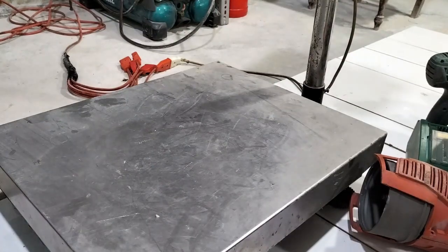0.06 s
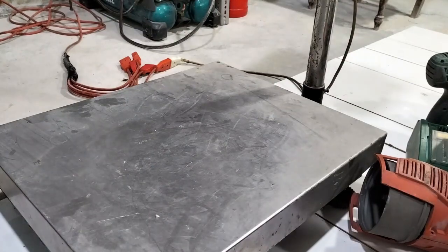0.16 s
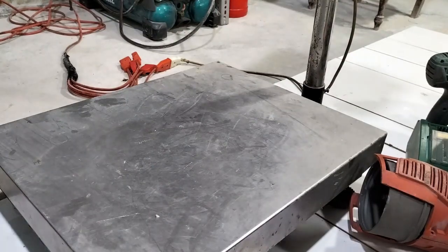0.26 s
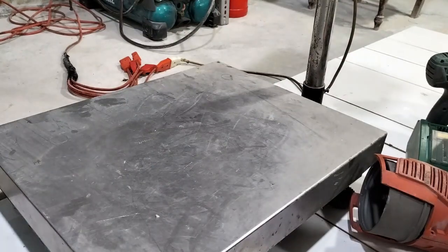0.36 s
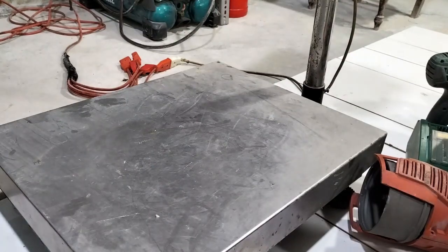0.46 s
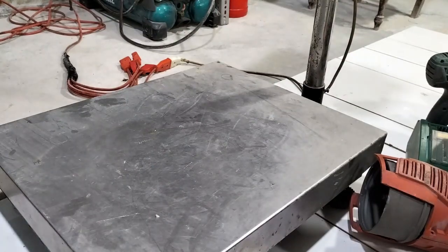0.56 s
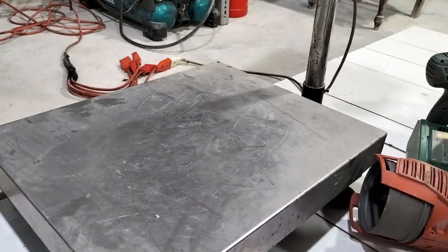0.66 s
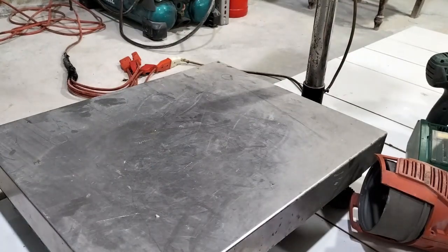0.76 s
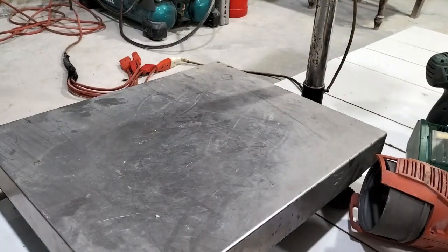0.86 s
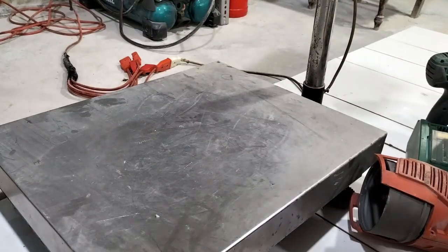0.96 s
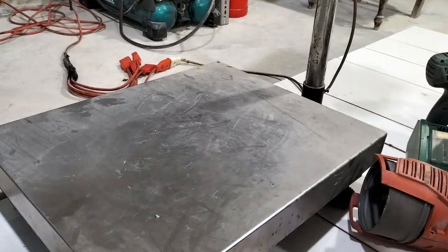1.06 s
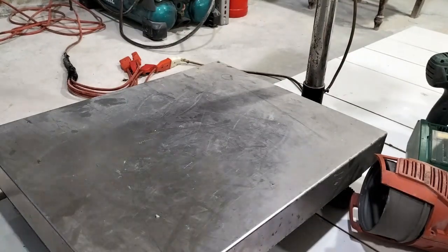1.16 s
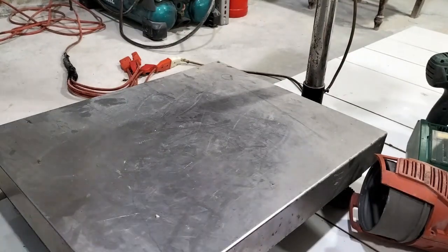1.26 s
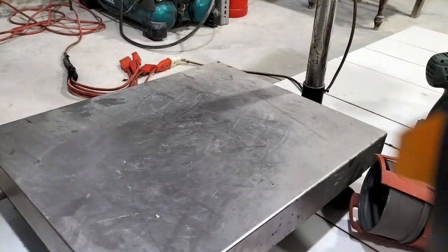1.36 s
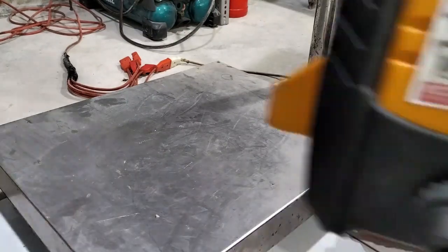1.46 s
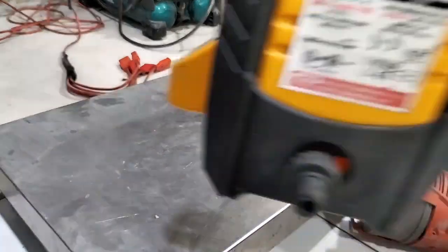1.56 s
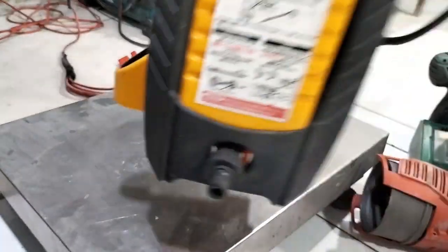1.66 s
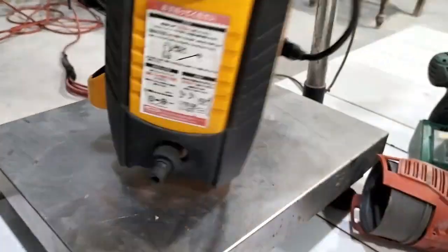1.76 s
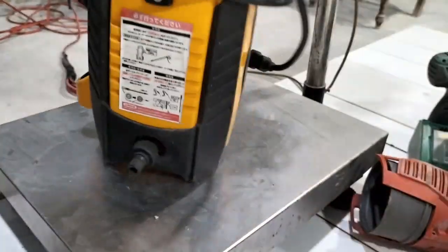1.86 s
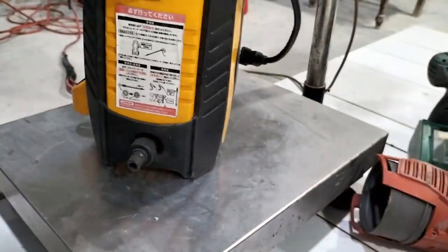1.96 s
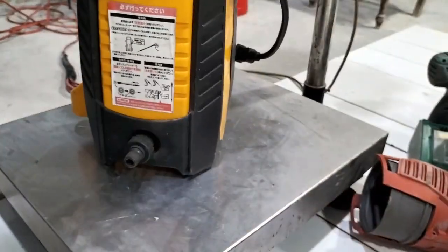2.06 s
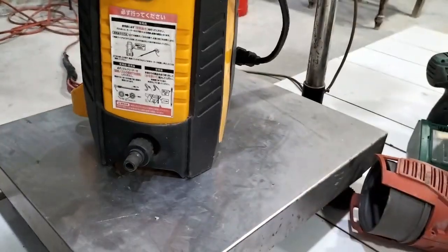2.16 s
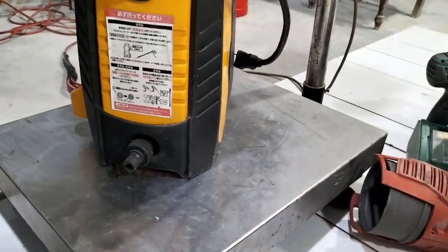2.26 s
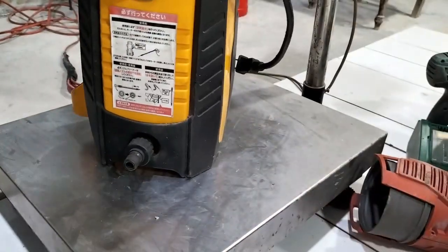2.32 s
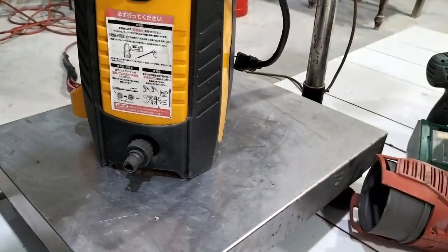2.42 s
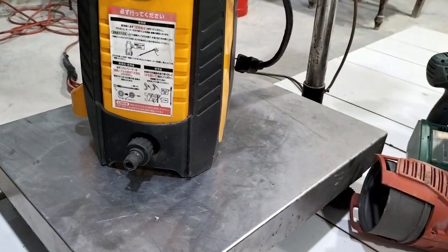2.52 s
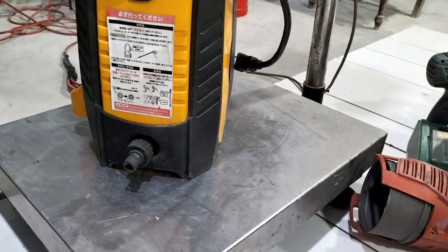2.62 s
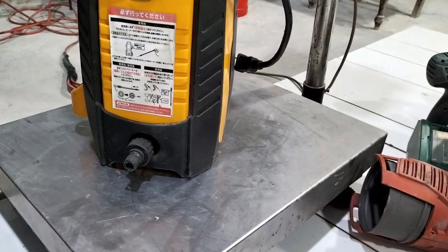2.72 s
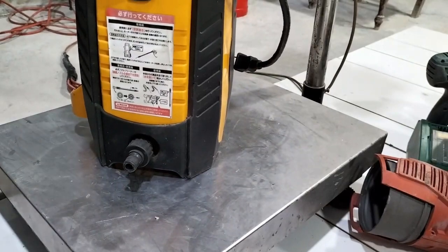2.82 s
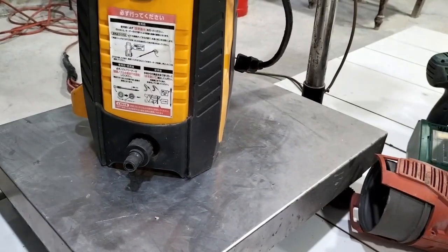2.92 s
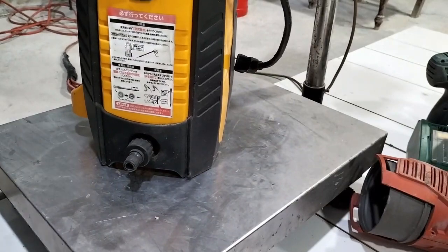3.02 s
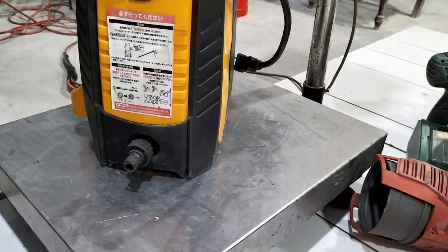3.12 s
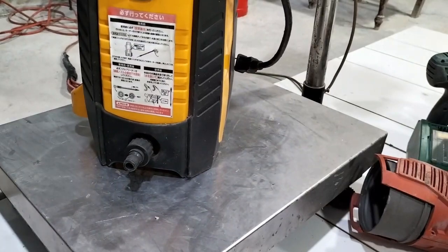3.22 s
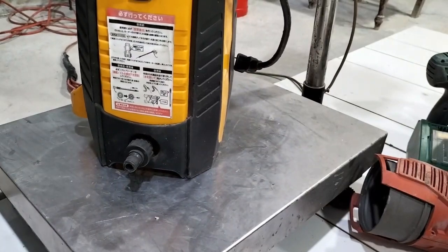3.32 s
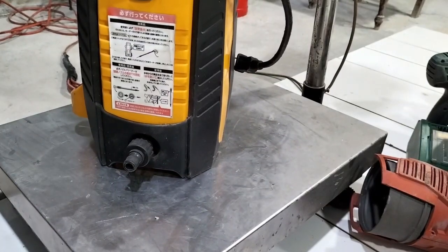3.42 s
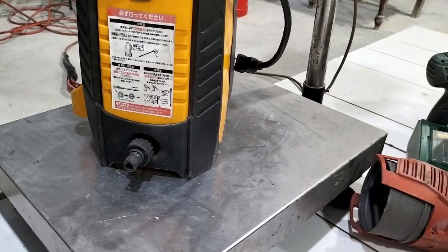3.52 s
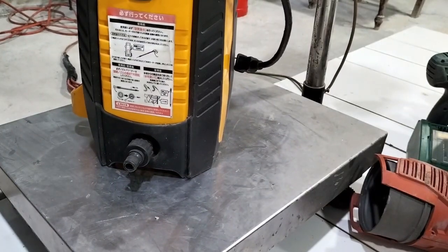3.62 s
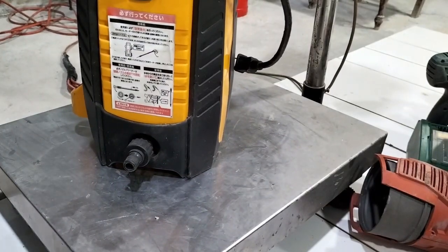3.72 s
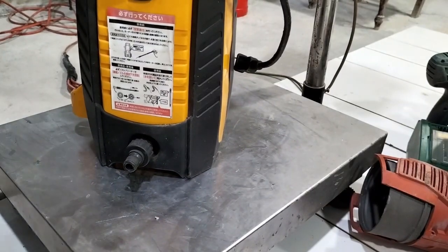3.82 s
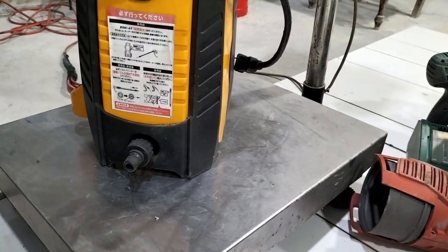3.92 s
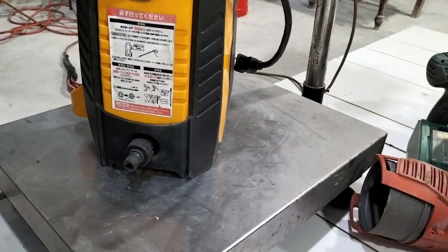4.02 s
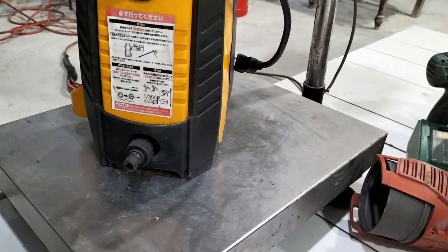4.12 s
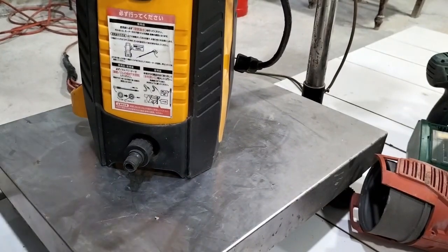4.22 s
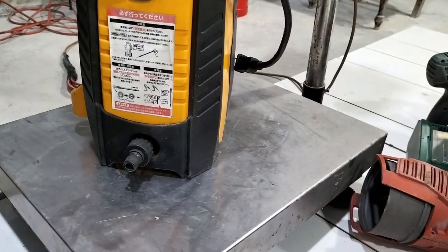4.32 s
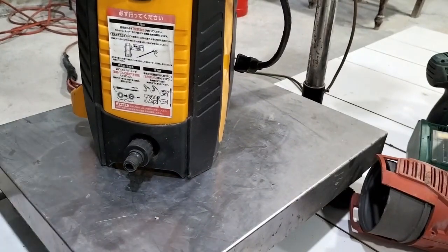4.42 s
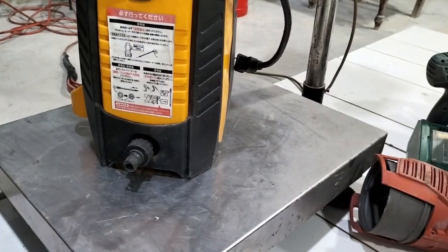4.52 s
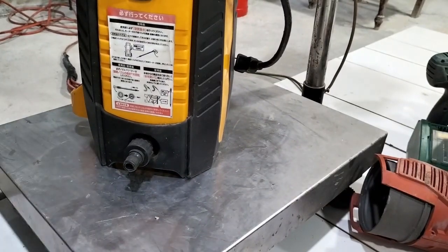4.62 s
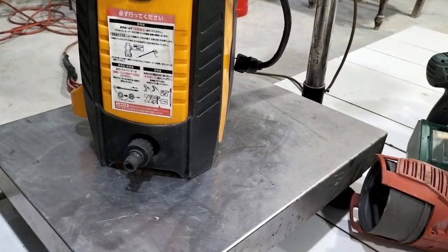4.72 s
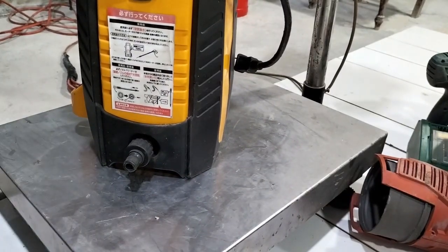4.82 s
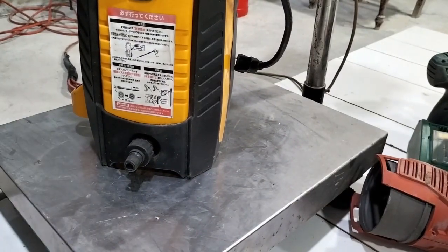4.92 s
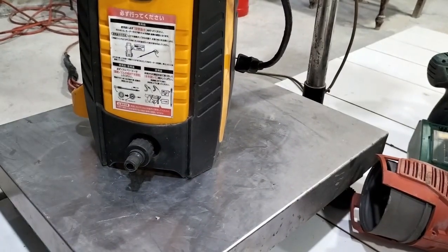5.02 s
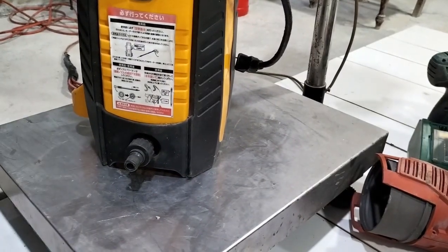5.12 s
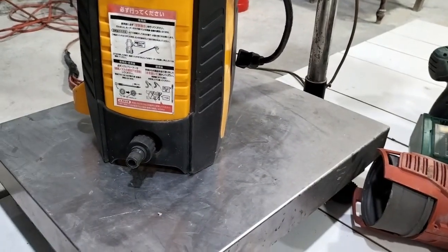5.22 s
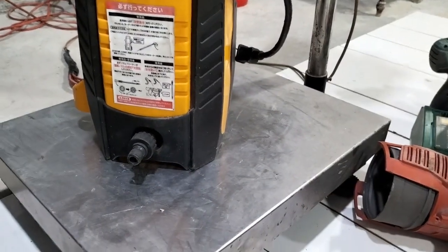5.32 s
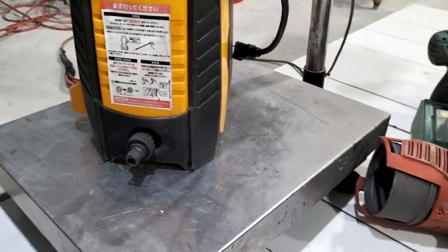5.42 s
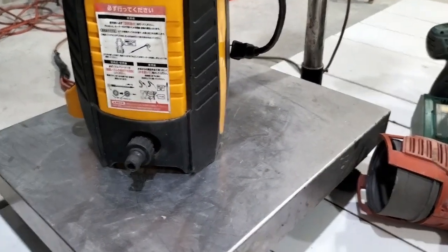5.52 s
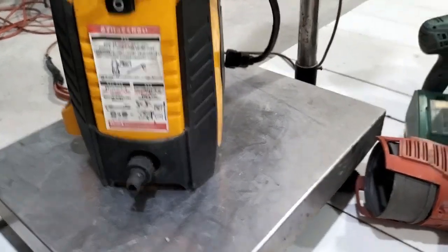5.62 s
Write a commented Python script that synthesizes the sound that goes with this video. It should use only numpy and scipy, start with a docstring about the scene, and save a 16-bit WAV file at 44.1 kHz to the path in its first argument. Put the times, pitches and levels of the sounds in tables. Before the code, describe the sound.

A heavy machine knocks down onto a steel platform and rocks in fading knocks, followed by light handling taps and scuffs.

```python
"""A steel platform scale booms and rings as a heavy machine is lowered onto it in a quiet workshop. It rocks on
its feet in ever lighter knocks: each impact drives the frame, the plate's bending modes and loose parts. Shoes
and hands scuff by friction; light taps, many of them clacks of the rocking frame, sound as short pulses. The
knocks and taps reverberate. Faint whistles come and go, and a hum wavers over the noise of the room."""
import sys
import numpy as np
from scipy import signal
from scipy.fft import rfft, irfft
from scipy.io import wavfile
from scipy.ndimage import uniform_filter1d

SR = 44100
rng = np.random.default_rng(int(sys.argv[2]) if len(sys.argv) > 2 else 0)


def master_out(mix):
    """Clip the mix to full scale and print it as 16-bit PCM to the path in sys.argv[1]."""
    frames = np.transpose(np.atleast_2d(mix))
    ceiling = np.clip(frames, -1, 1)
    pcm = np.round(ceiling * 32767).astype(np.int16)
    wavfile.write(sys.argv[1], SR, pcm)


N = 250179


def gain_of(db):
    """Amplitude ratio of a level in decibels."""
    return 10 ** (np.asarray(db) / 20)


def unit_rms(x):
    """Normalisation to unit mean power."""
    return x / np.sqrt(np.mean(x ** 2) + 1e-20)


def value_at(points, hz):
    """Interpolation on a logarithmic frequency axis."""
    point_hz, value = np.transpose(points)
    return np.interp(np.log(hz + 1), np.log(point_hz + 1), value)


def add(mix, start_s, sound):
    """Superposition of a sound on the mix."""
    part = mix[round(start_s * SR):][:len(sound)]
    part += sound[:len(part)]


def sample_curves(rows):
    """Linear interpolation of timed rows: gives the start, a gate with 4 ms fades and the curves."""
    times, *columns = np.transpose(rows)
    t = np.arange(times[0], times[-1], 1 / SR)
    fade = np.clip(np.minimum(t - times[0], times[-1] - t) / .004, 0, 1)
    return times[0], fade, [np.interp(t, times, column) for column in columns]


def coloured(x, spectrum):
    """Filtering by multiplication of spectra, normalised to unit rms."""
    hz = np.fft.rfftfreq(len(x), 1 / SR)
    return unit_rms(irfft(rfft(x) * gain_of(value_at(spectrum, hz)), len(x)))


def band(x, low_hz, high_hz):
    """Third-order band-pass filtering."""
    sections = signal.butter(3, [low_hz, min(high_hz, SR / 2.2)], "band", fs=SR, output="sos")
    return signal.sosfilt(sections, x)


def resonate(x, hz, width_hz):
    """Resonance by heterodyning: shift the pitch down to zero, smooth, shift back."""
    carrier = np.exp(2j * np.pi * np.cumsum(hz * np.ones(len(x))) / SR)
    pole = np.exp(-np.pi * width_hz / SR)
    return 2 * (carrier * signal.lfilter([1 - pole], [1, -pole], x / carrier + 1e-18)).real


def arch(start_s, length_s, peak_db, hz):
    """A parabolic level envelope at steady pitch, 11 dB down at its ends."""
    return [(start_s + length_s * (u + 1) / 2, peak_db - 11 * u ** 2, hz) for u in np.linspace(-1, 1, 9)]


def room_noise():
    """Ambient noise: a random spectrum with drifting patches and slow modulation of the bass."""
    # spectrum of the background: frequency_hz, level_db
    spectrum = [(15, -69), (25, -30.5), (140, -9.5), (227, -8), (349, -5.5), (433, -12), (826, -17.5),
                (1080, -18), (1300, -21), (1850, -34), (2490, -31.5), (5880, -38.5), (15500, -51.5)]
    # swell of the low rumble: time_s, gain_db
    rumble = [(0, -3.5), (.6, -5), (1.1, .5), (1.95, 1), (2.3, 4), (3.4, 4), (3.7, 2), (5, 1.5),
              (5.67, -1.5)]
    frames, hz = N // 256 + 5, np.fft.rfftfreq(1024, 1 / SR)
    real, imag, patches = rng.standard_normal((frames, 513, 3)).T
    patches = unit_rms(uniform_filter1d(uniform_filter1d(patches, 3, 0), 14, 1))
    bass = np.clip(np.log2(900 / (hz + 1)), 0, 1)[:, None]
    swell_db = bass * np.interp(np.arange(frames) * 256 / SR, *np.transpose(rumble))
    spectra = (real + 1j * imag) * gain_of(value_at(spectrum, hz)[:, None] + 2.5 * patches + swell_db)
    return gain_of(-66) * unit_rms(signal.istft(spectra, nperseg=1024, noverlap=768)[1][:N])


def hum(rows):
    """Amplitude modulation: a soft pure tone swells and sinks."""
    start_s, fade, (db, hz) = sample_curves(rows)
    return start_s, fade * np.sqrt(2) * gain_of(db) * np.sin(2 * np.pi * np.cumsum(hz) / SR)


def stroke(start_s, rise_s, hold_s, db, *colour):
    """The envelope of one scuff: rise, hold and exponential decay."""
    fall_s, fall_db_per_s = .15, 237.5
    release_s = start_s + rise_s + hold_s
    return [(start_s, db - 14.5, *colour), (start_s + rise_s, db, *colour), (release_s, db, *colour),
            (release_s + fall_s, db - fall_db_per_s * fall_s, *colour)]


def friction(rows):
    """Friction noise: uneven grains excite brief, wandering resonances; pressure shifts the colour."""
    # spectrum of rubbing: frequency_hz, density_db
    spectrum = [(240, -26.5), (400, 3.5), (459, -10), (749, 4.5), (987, -0.5), (1490, 2.5), (1910, -12),
                (2430, -7), (6280, -15), (6990, -13), (9350, -23.5), (11900, -16), (15500, -24.5)]
    start_s, fade, (db, low_db, bright_db, top_db) = sample_curves(rows)
    count = len(db)
    grain_size = gain_of(1.1 * np.minimum(rng.exponential(1, count), 4))
    grains = grain_size * (rng.random(count) < 1500 / SR) * rng.standard_normal(count)
    rubbing = coloured(0.85 * unit_rms(grains) + rng.standard_normal(count), spectrum)
    hz, t, spectra = signal.stft(rubbing, SR, nperseg=512, noverlap=448)
    resonances = rng.standard_normal(spectra.shape[::-1]).T
    resonances = unit_rms(uniform_filter1d(uniform_filter1d(resonances, 2, 0), 24, 1))
    at = np.minimum((t * SR).astype(int), count - 1)
    octave = np.log2(hz + 1)[:, None]
    low = np.clip(np.log2(2600) - octave, 0, 1)
    top = np.clip(4 * (octave - np.log2(9000)), 0, 1)
    bright = np.clip(1.35 * (octave - np.log2(3300)), 0, 1) - top
    spectra *= gain_of(3.5 * resonances + low * low_db[at] + bright * bright_db[at] + top * top_db[at])
    return start_s, fade * gain_of(db) * signal.istft(spectra, SR, nperseg=512, noverlap=448)[1][:count]


def tap(db, hz, cycles, edge_db):
    """A light impact: a damped pulse with a bright edge, then a diffuse tail of early reflections."""
    t = np.arange(SR // 5) / SR
    u = t * hz / cycles
    pulse = 8.5 * u ** 1.373 * np.exp(-4.5 * u ** 1.805) * np.sin(2 * np.pi * hz * t)
    dull, bright = rng.standard_normal((2, len(t)))
    top_hz = 4500 + 0.41 * hz
    dull = unit_rms(band(dull, .5 * hz, 1.54 * hz))
    bright = gain_of(edge_db) * unit_rms(band(band(bright, 0.26 * top_hz, top_hz), 0.067 * top_hz, top_hz))
    edge = bright * np.exp(-t / 0.0015) * (1 - np.exp(-t / 0.00084))
    tail = gain_of(-11.5 - 60 * t / 0.065) * (dull + .5 * bright) * (1 - np.exp(-t / 0.0065))
    return gain_of(db) * (pulse + edge + tail)


def whistle(rows, width_hz):
    """Narrow-band noise: two passes through one resonance leave a thin, fuzzy pitch."""
    start_s, fade, (db, hz) = sample_curves(rows)
    narrow = resonate(rng.standard_normal(len(db)), hz, width_hz)
    return start_s, fade * gain_of(db) * unit_rms(resonate(narrow, hz, width_hz))


def platform_blow(boom_hz, boom_db, rise_s, ring_db, clatter_db, t60_s):
    """Impact excitation: the frame booms, the plate rings in its normal modes, loose parts clatter."""
    # plate modes, whose decay each blow rescales: frequency_hz, level_db, nominal_t60_s
    modes = [(401, -1.5, 0.15), (480, 1, 0.21), (577.8, -4.5, 0.19), (674.4, -7.5, 0.16),
             (760, -6.5, 0.094), (976, -9.5, 0.16), (1095, -15, .12), (1126, -7, 0.13), (1305, -10, 0.38),
             (1360, -28, 0.13), (1412, -4.5, 0.05), (1640, -4, 0.27), (1735, 0, 0.14), (1730, -6, 0.54),
             (2050, -17.5, 0.26), (2180, -27.5, 0.17), (2520, -1.5, 0.1), (2450, -28.5, .2),
             (2680, -16, 0.58), (3130, -28.5, 0.068), (3850, -23, .2), (4060, -29, 0.9), (5700, -35, .2),
             (7600, -41, .2)]
    # spectrum of the loose parts: frequency_hz, density_db
    clatter_spectrum = [(290, -24.5), (500, -3.5), (792, -5.5), (1240, -10.5), (1670, -9.5), (1900, -14),
                        (2070, -11), (3680, -22), (7340, -36), (9650, -45.5), (15500, -53)]
    t = np.arange(SR // 3) / SR
    u = t / max(rise_s, .002)
    swell = u * np.exp(.5 - .5 * u ** 2) + 0.21 * np.exp(-t / (0.26 * t60_s)) * (1 - np.exp(-u))
    floor_thud = 0.051 * np.exp(-t / 0.024) * (1 - np.exp(-t / 0.0069)) * np.sin(2 * np.pi * 120 * t)
    boom = swell * np.sin(2 * np.pi * boom_hz * t) + floor_thud
    mode_hz, mode_db, nominal_t60_s = np.transpose(modes)[:, :, None]
    # each blow lands elsewhere and favours other modes
    coupling, polarity = rng.standard_normal((2, len(modes), 1))
    hardness_db = (clatter_db - ring_db - 12) * np.clip(np.log2(mode_hz / 1000), 0, 1)
    decay_db = -60 * t / (np.minimum(nominal_t60_s, .25) * t60_s / 0.17)
    amplitude = np.sign(polarity) * gain_of(mode_db + 2 * coupling + hardness_db + decay_db)
    ring = (amplitude * np.sin(2 * np.pi * mode_hz * t)).sum(0)
    contact = unit_rms(uniform_filter1d(rng.standard_normal(len(t)), 90))  # parts touch in uneven bursts
    clatter = coloured(rng.standard_normal(len(t)) * gain_of(1.7 * contact), clatter_spectrum)
    clatter *= gain_of(-60 * t / max(t60_s, .02))
    metal = gain_of(ring_db) * ring + gain_of(clatter_db) * clatter
    return gain_of(boom_db) * boom + metal * (1 - np.exp(-t / 0.00083))


def reverberation(x):
    """Convolution with sparse reflections of random sign, each band decaying at its own rate."""
    # reverberation time of the workshop: frequency_hz, t60_s
    decay_times = [(200, 0.46), (1000, 0.1), (4000, 0.24), (10000, 0.26)]
    reflections = np.zeros(SR // 2)
    slots = np.arange(300, SR // 2 - 20, 20)
    reflections[slots + rng.integers(0, 20, len(slots))] = rng.choice([-1., 1.], len(slots))
    hz, t, spectra = signal.stft(reflections, SR, nperseg=256)
    decay = gain_of(-60 * t / value_at(decay_times, hz)[:, None])
    tail = signal.istft(spectra * decay, SR, nperseg=256)[1]
    return signal.fftconvolve(x, tail / np.linalg.norm(tail))[:N]


def scene():
    """Superposition: impacts excite the room; noise, hum, friction and whistles arrive direct."""
    # low swelling tones: start_s, length_s, peak_db, pitch_hz
    hums = [(0, 0.63, -73, 399.7), (.3, 0.43, -74, 201.4), (0.724, 0.21, -72, 406),
            (0.899, 0.24, -66, 403.3), (.6, 0.085, -70, 318), (0.903, 0.089, -68, 323),
            (1.199, .1, -68, 257), (.92, 0.36, -70.5, 200), (1.151, 0.31, -66, 399.4),
            (1.401, 0.25, -72.5, 400.3), (1.4, 0.37, -73, 199.7), (3.498, 0.29, -68, 399.3),
            (3.55, 0.27, -74, 203.5), (3.798, 0.5, -66.5, 380.3), (4.239, 0.22, -59, 380.7),
            (4.64, 0.27, -65, 350.4), (4.952, 0.42, -71, 305.8), (5.149, .35, -74.5, 346)]
    # scuffs of soles and hands: start_s, rise_s, hold_s, level_db, low_db, bright_db, top_db
    scuffs = [(0.261, 0.017, 0.038, -48.5, -16, -3, -8.5), (0.333, 0.0078, 0.013, -52, -18, -2, -12),
              (0.429, 0.0076, 0.015, -72, -7, 6, -12), (.645, 0.05, 0.042, -65.5, -18, 6, 1),
              (0.806, 0.065, .015, -57.5, -15.5, -3.5, -10), (0.943, 0.064, .015, -55.5, -11.5, -4, -12),
              (1.018, 0.023, 0.052, -54.5, -21, 7, 0.5), (1.529, 0.016, 0.027, -64, -13, -6.5, -12),
              (2.347, 0.0049, 0.021, -67, -3, 4, 0.5), (2.508, 0.015, 0.0059, -61.5, -7, 1, -1),
              (2.596, 0.012, .005, -56, 3, -40, -40), (2.692, .018, .005, -60, 7.5, -4.5, -35),
              (2.788, 0.0056, 0.012, -67.5, 1, 3.5, -25), (2.908, 0.0091, 0.026, -71.5, -9, 5.5, 1.5),
              (2.975, 0.013, 0.026, -64.5, -8, 0, -30), (3.094, 0.0069, 0.016, -75, -2, 6, -22),
              (3.309, 0.015, .04, -72.5, -1, 0.5, -22), (3.614, 0.0074, 0.0066, -53.5, -12.5, -4, -11),
              (3.709, 0.032, .005, -57.5, -5, 3, -3), (3.746, 0.0078, 0.0049, -40, -7.5, -7.5, -13.5),
              (4.052, 0.0047, 0.0088, -46.5, -4.5, -4.5, -7), (4.081, 0.012, 0.021, -48, -5, -8.5, -22),
              (4.421, .003, .002, -69, -3, 6, -25), (4.447, 0.0064, 0.0065, -66, -10, 4.5, -25),
              (4.721, 0.038, 0.15, -70, -3.5, 0.5, -15), (5.488, 0.014, 0.0086, -82, -4, 7, -19),
              (5.591, 0.0045, .055, -81, -15, 11, -6)]
    # short taps: start_s, level_db, pitch_hz, cycles, edge_db
    taps = [(.265, -48.5, 1590, 1.1, -25), (0.279, -37, 3730, 0.64, -10), (0.312, -43, 2660, 3.7, -21),
            (.351, -44.5, 2410, 1.4, 0), (.435, -49.5, 1340, 8.1, -18), (.996, -56.5, 580, 4.1, 11),
            (1.455, -45.5, 580, 1.26, -12), (1.726, -21.5, 807, 2.2, -18), (1.728, -37.5, 422, 2, -28),
            (1.978, -15.5, 1300, 1.2, -24), (2.185, -28, 816, 2.3, -28), (2.448, -41, 1020, 3, -20),
            (2.525, -49.5, 4190, 21, -30), (2.56, -43, 1108, 13, -8), (2.563, -55.5, 3940, 16, -20),
            (2.606, -44.5, 2290, 2.2, -17), (2.617, -38, 560, 3.5, -30), (2.705, -43, 1385, 10.3, -13),
            (2.788, -43.5, 1050, 3.7, -21), (2.951, -54.5, 1300, 4.3, -13), (3.157, -54.5, 610, 4.7, -19),
            (3.176, -52.5, 633, 7.8, -25), (3.315, -55, 704, 2.5, -9), (3.622, -50, 3960, 5.4, -7),
            (3.757, -30.5, 2500, 3.3, -9), (3.762, -40, 736, 6, -31), (3.785, -36.5, 950, 3.6, -15),
            (3.991, -27.5, 626, 4, -12), (3.995, -38, 389, 3.6, -24), (4.001, -33, 1210, 2.1, -6.5),
            (4.02, -44, 680, 4, -36), (4.053, -46, 1400, 3.8, -7), (4.06, -46, 1290, 9.4, 2),
            (4.085, -48, 1410, 6.1, -14), (4.426, -52.5, 1400, 7.7, -3), (4.456, -60, 1450, 9.4, -14),
            (5.362, -66.5, 2650, 3.6, 3), (5.594, -57, 6070, 2, 5.5)]
    # unbroken rustle of handling: time_s, level_db, low_db
    rustle = [(.39, -72, 0), (.47, -80, -3), (.6, -91, -10), (.7, -66, -11), (1.0, -66.5, -9.5),
              (1.15, -59, -17), (1.3, -69, -11), (1.5, -72.5, -4), (1.72, -83.5, -3.5), (2.3, -78, 0.5),
              (2.46, -69.5, 2), (2.6, -83.5, 2), (3.0, -76, 5), (3.55, -68.5, -6), (3.7, -68.5, -11),
              (3.95, -71.5, -4), (4.3, -74, -9), (4.7, -78.5, -5), (5.1, -92, 10)]
    # thin whistles and chirring: start_s, length_s, peak_db, pitch_hz, width_hz
    whistles = [(.67, .12, -69, 3890, 448), (2.379, 0.037, -70, 3960, 350), (2.408, .035, -66, 3940, 350),
                (3.343, 0.33, -76.5, 3240, 90), (3.417, 0.17, -66, 780, 198),
                (4.28, 0.18, -79.5, 5930, 390), (4.628, 0.15, -80, 5850, 390),
                (4.844, 0.15, -78.5, 5800, 390), (5.144, 0.1, -88, 5870, 390),
                (5.616, 0.047, -77, 3770, 400), (3.624, 0.06, -66, 4100, 500), (1.04, .1, -68, 6850, 900)]
    # blows on the platform: start_s, boom_hz, boom_db, rise_s, ring_db, clatter_db, t60_s
    blows = [(1.979, 340, -22, 0.0056, -42.5, -28.5, 0.18), (2.002, 343.4, -25, 0.0081, -42, -37.5, 0.39),
             (2.073, 314.6, -28, 0.0045, -42.5, -35, 0.12), (2.118, 404, -36, 0.012, -60, -41, 0.2),
             (2.164, 338, -32.5, 0.0048, -46, -51, 0.39), (2.24, 314, -29, 0.0051, -40, -40.5, .22),
             (2.303, 338.4, -38, 0.0047, -41, -42.5, 0.16), (2.344, 274, -45, .004, -61, -54.5, .12),
             (2.394, 296, -49, 0.012, -54.5, -66, 0.34), (2.446, 302, -47, 0.0076, -49, -73, 0.067),
             (2.484, 277, -65, .014, -68, -58.5, 0.11), (2.52, 317, -46.5, 0.024, -51.5, -56, 0.2),
             (2.561, 301.6, -32, 0.0086, -44.5, -64.5, 0.068), (2.605, 353, -49, 0.01, -44, -56, 0.12),
             (2.695, 299, -38, .016, -53, -64, .14), (2.72, 303, -41, 0.0063, -52.5, -56.5, 0.15),
             (2.787, 288, -56, 0.019, -52, -62.5, 0.16), (2.808, 400, -50.5, 0.018, -51.5, -64, 0.096),
             (2.863, 316, -45, 0.0048, -60, -79, 0.048), (2.875, 315, -41.5, 0.011, -63, -70, 0.35),
             (2.917, 327, -46, 0.0066, -57, -75, 0.17), (2.991, 279, -54, .015, -52.5, -66.5, 0.14),
             (3.089, 325, -53, .011, -57.5, -65.5, 0.16), (3.25, 298, -45.5, 0.012, -67.5, -68.5, 0.34),
             (3.317, 372, -60, 0.012, -57.5, -62, 0.23), (3.343, 405, -54.5, 0.0074, -70, -63, .088),
             (3.389, 278, -52, .013, -79, -79.5, 0.22), (3.459, 249, -61.5, 0.016, -63, -73, .22),
             (3.5, 268, -59, .01, -59, -90, 0.11)]
    rustle_bright_db, rustle_top_db = -2.5, -9.5
    impacts, direct = np.zeros(N), room_noise()
    for start_s, *row in blows:
        add(impacts, start_s, platform_blow(*row))
    for start_s, *row in taps:
        add(impacts, start_s, tap(*row))
    for row in scuffs:
        add(direct, *friction(stroke(*row)))
    add(direct, *friction([(*row, rustle_bright_db, rustle_top_db) for row in rustle]))
    for *row, width_hz in whistles:
        add(direct, *whistle(arch(*row), width_hz))
    for row in hums:
        add(direct, *hum(arch(*row)))
    return (impacts + gain_of(-7) * reverberation(impacts) + direct)[None]


def record(dry):
    """Frequency response: the microphone loses deep bass, dulls above 8 kHz and is band-limited."""
    hz = np.fft.rfftfreq(512, 1 / SR)
    response_db = value_at([(7800, 0.5), (9500, -12), (14000, -4.0)], hz)
    colour = signal.firwin2(255, hz, gain_of(response_db), fs=SR)
    band_limit = signal.firwin(511, cutoff=15660, window=("kaiser", 9), fs=SR)
    thinned = signal.lfilter(*signal.butter(1, 70, "high", fs=SR), dry)
    return signal.oaconvolve(thinned, np.convolve(colour, band_limit)[None], "same")


dry = scene()
out = record(dry)
master_out(out)
```